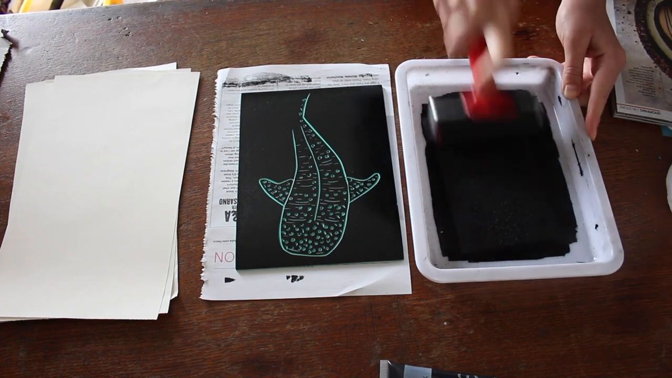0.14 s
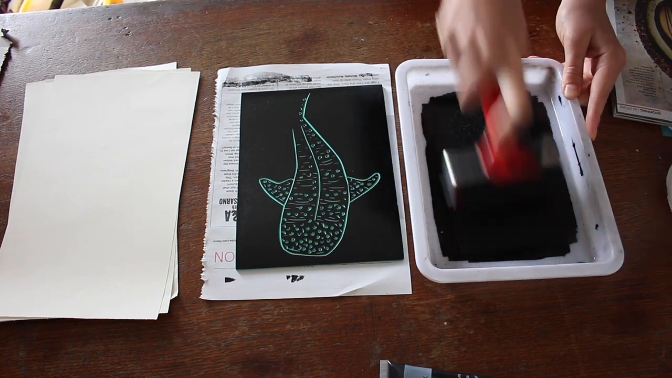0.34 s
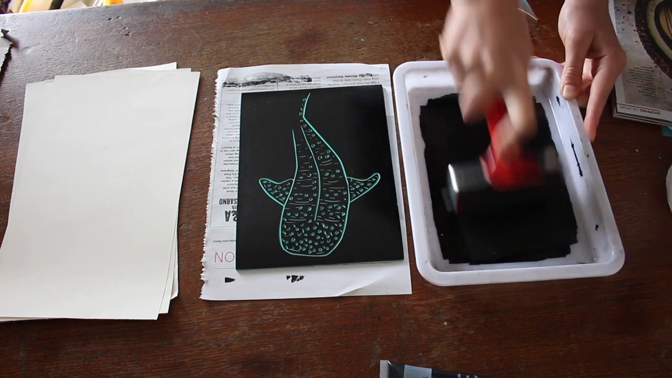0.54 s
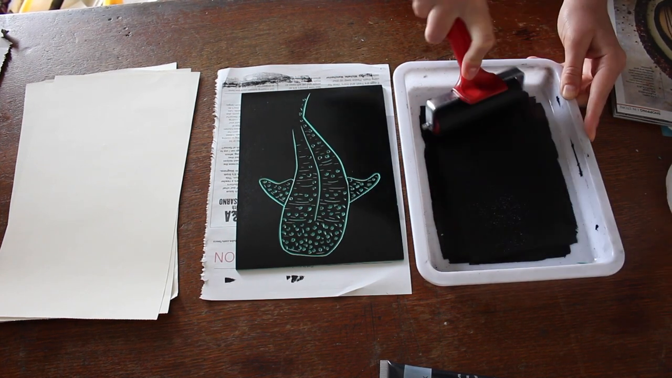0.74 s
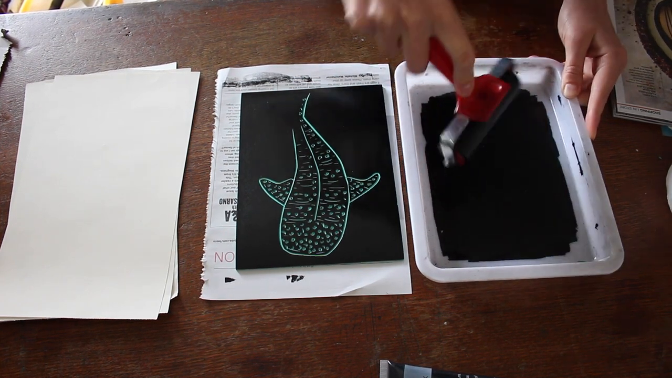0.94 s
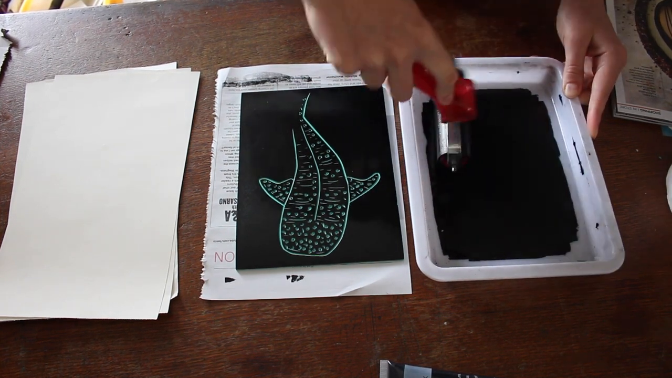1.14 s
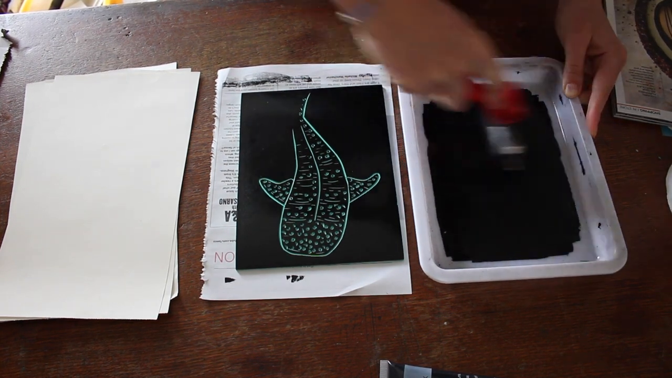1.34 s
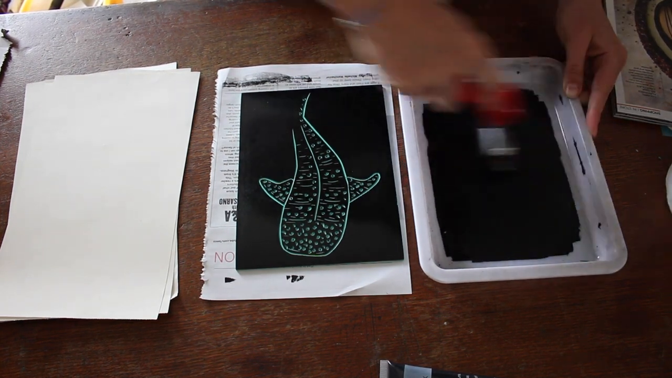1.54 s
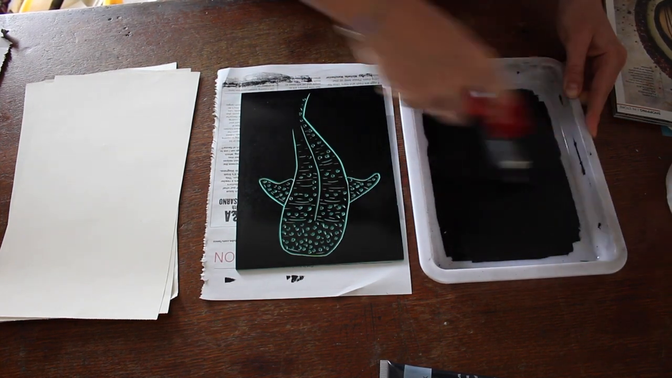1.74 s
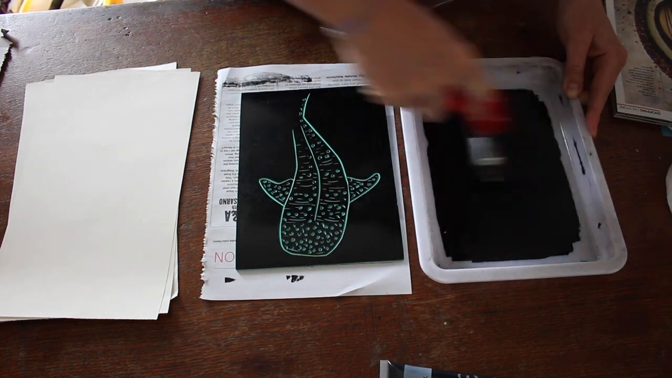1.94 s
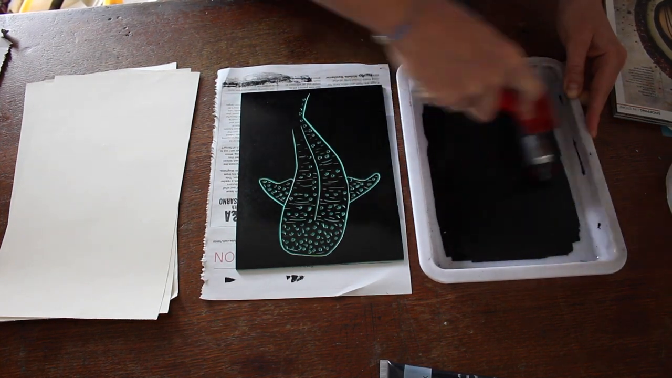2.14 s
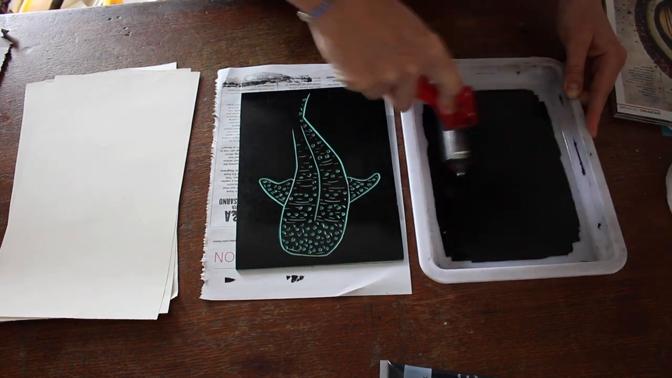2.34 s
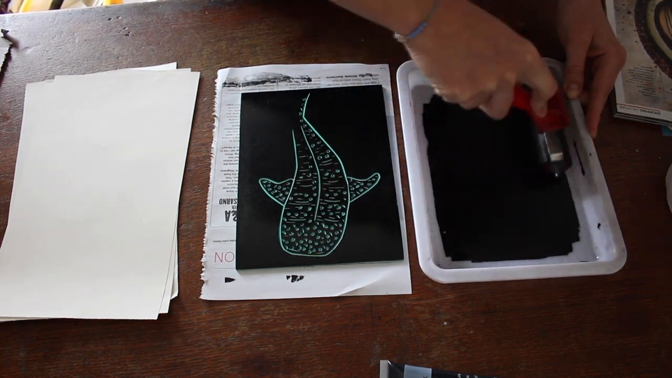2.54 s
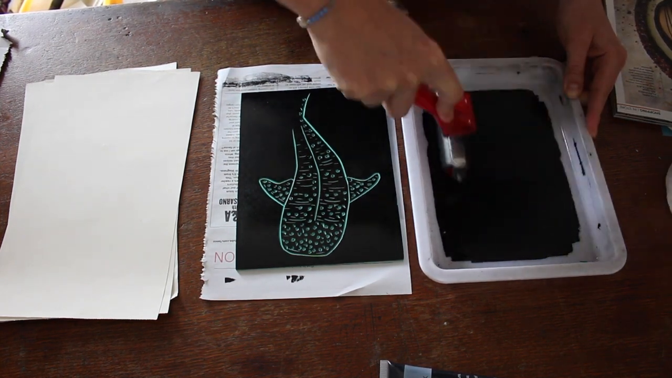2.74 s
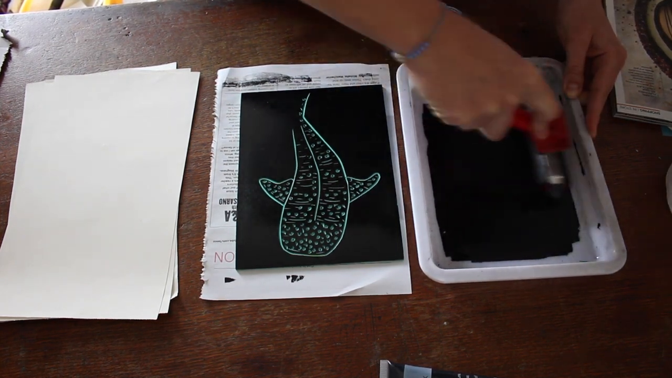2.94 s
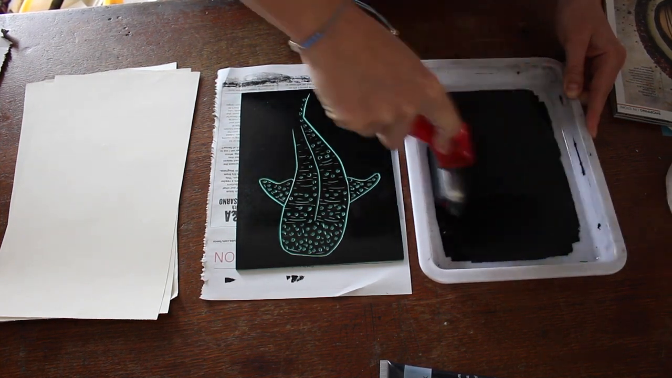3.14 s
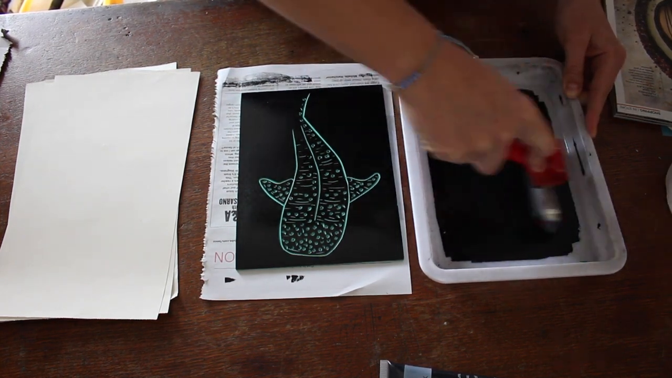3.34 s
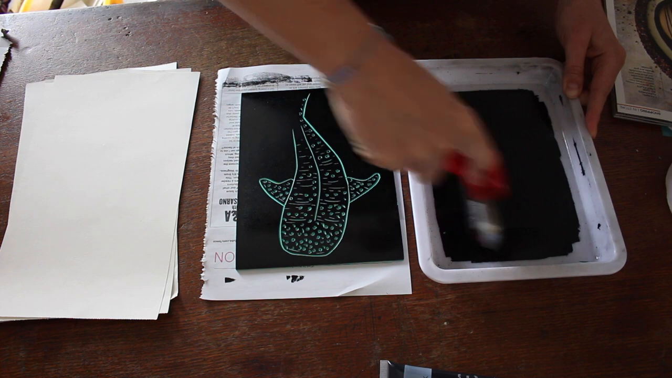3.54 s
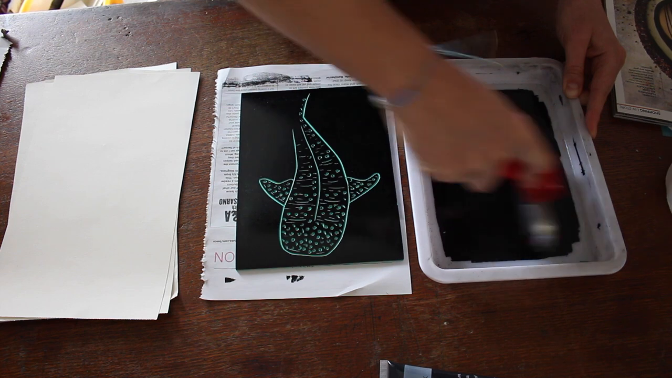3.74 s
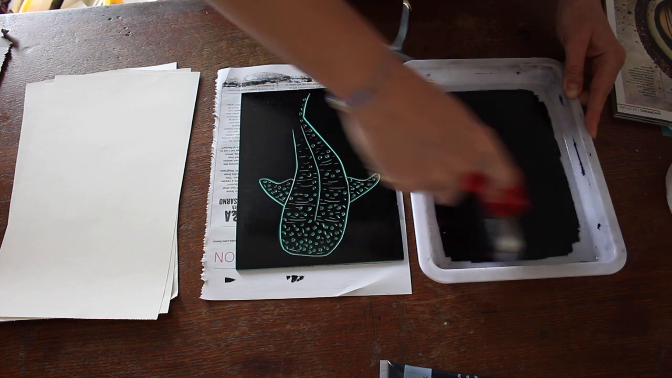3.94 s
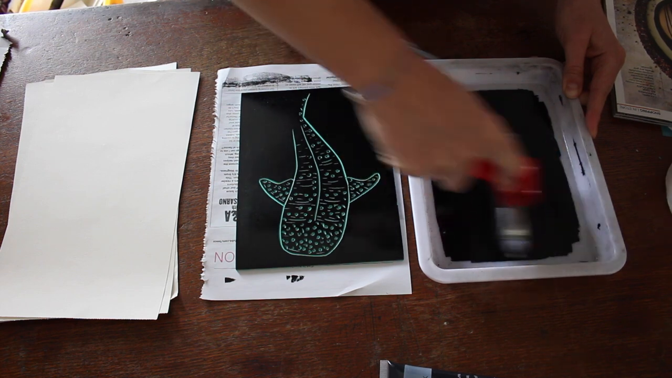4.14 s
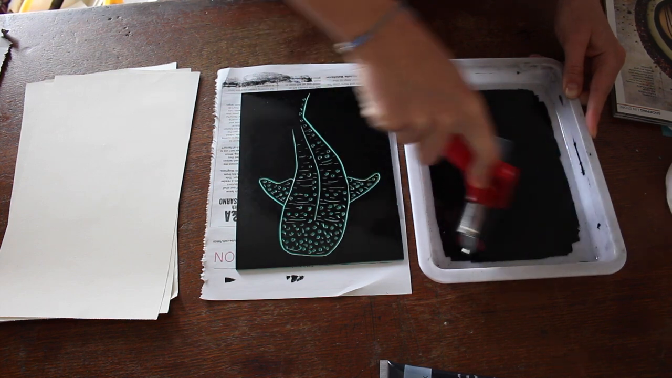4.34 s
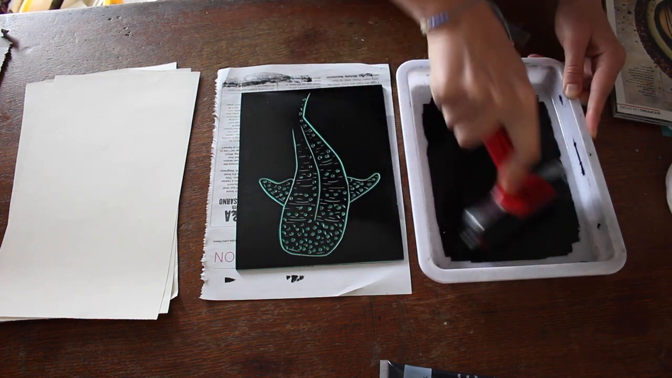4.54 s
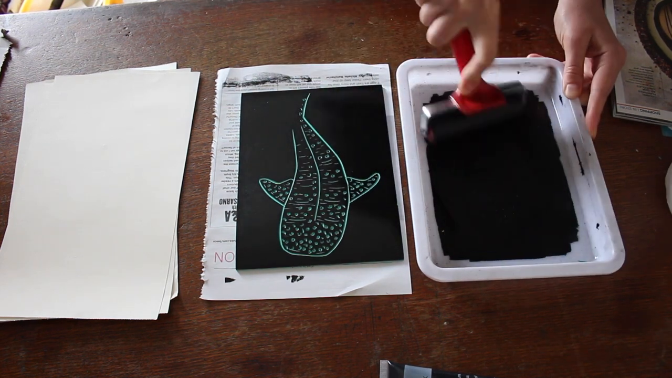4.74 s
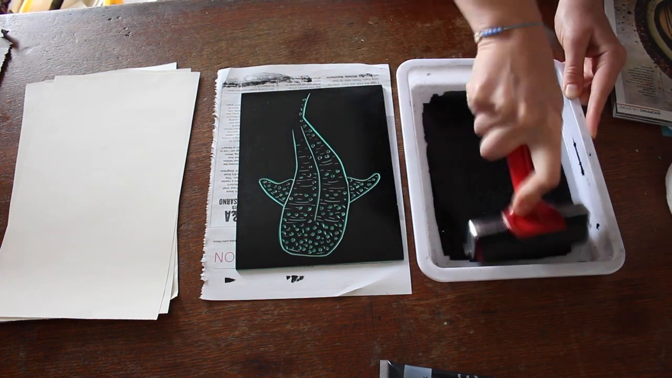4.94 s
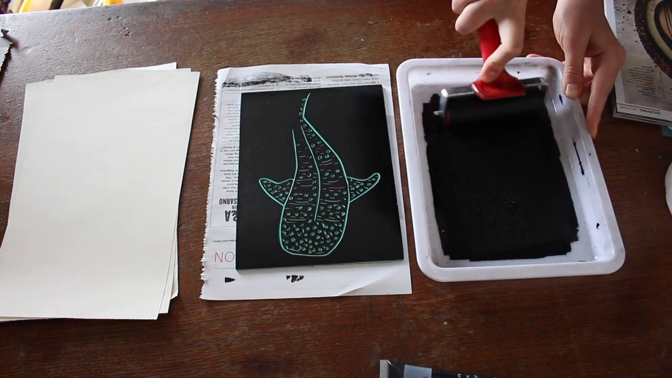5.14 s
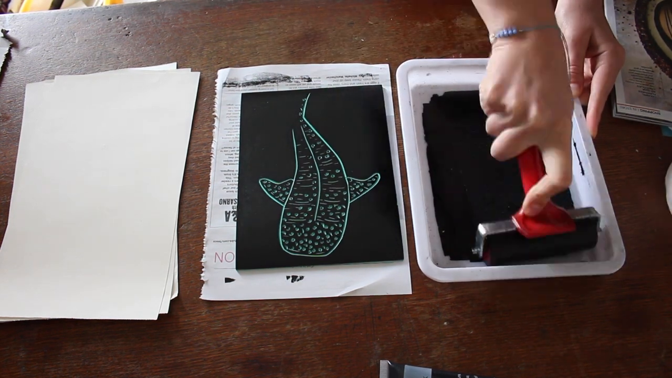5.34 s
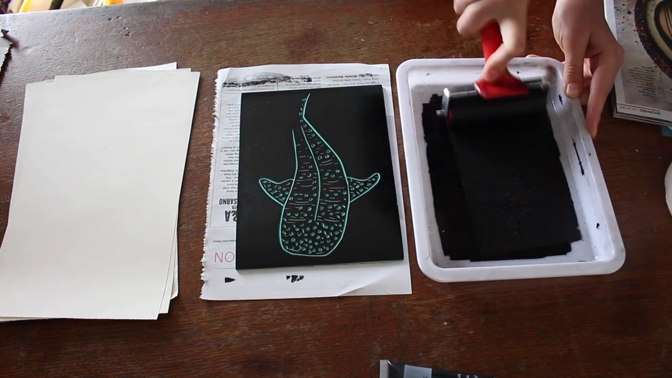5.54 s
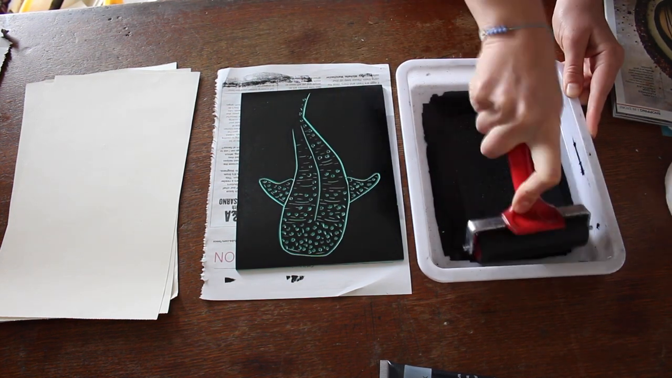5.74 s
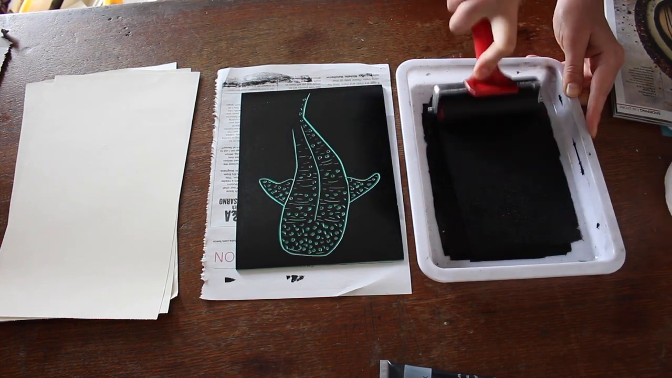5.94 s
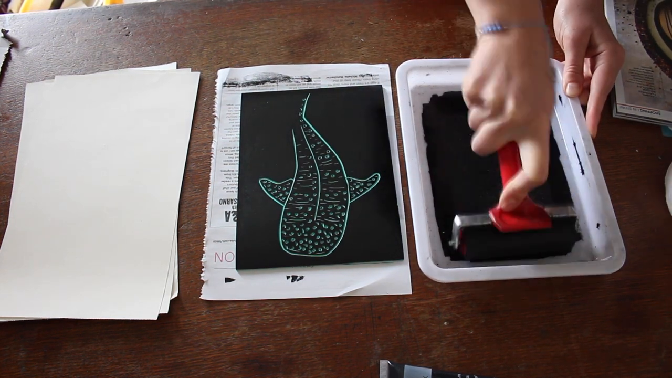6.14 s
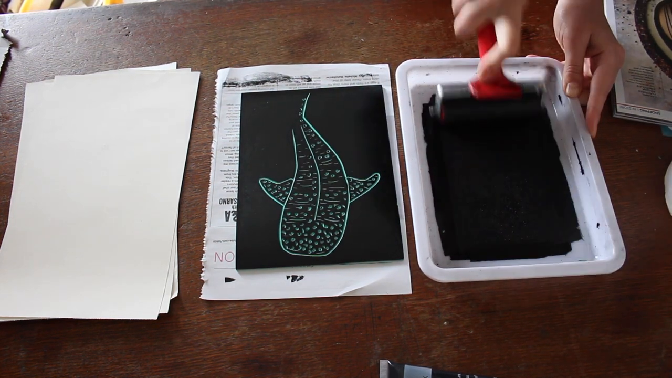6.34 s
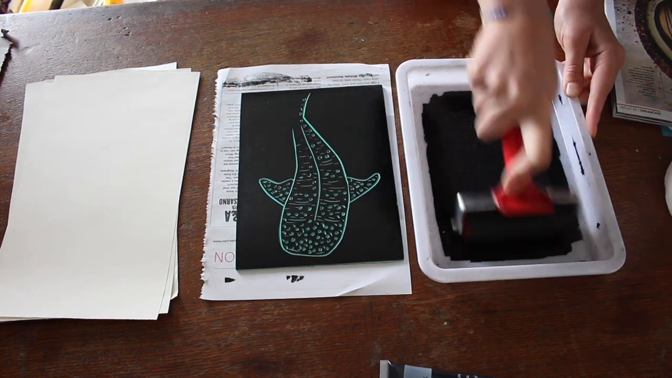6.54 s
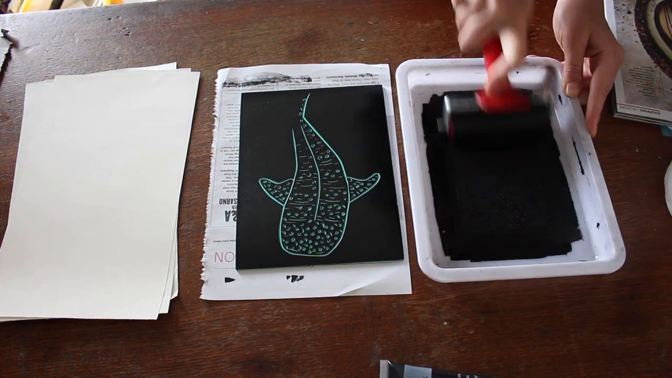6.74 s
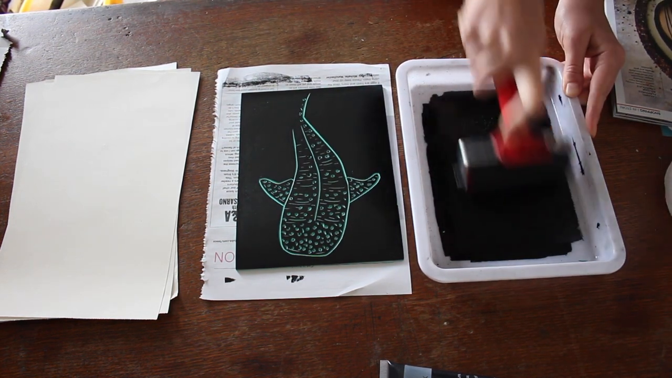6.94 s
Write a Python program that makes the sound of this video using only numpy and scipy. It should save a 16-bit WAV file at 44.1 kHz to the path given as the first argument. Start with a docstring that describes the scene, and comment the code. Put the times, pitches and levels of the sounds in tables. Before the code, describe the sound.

A rubber roller moves through tacky ink in a plastic tray on a wooden table, heard close in a small room with a short echo. From 0 to 0.87 seconds, long strokes make dense, bright, sticky crackling that swells with speed and thins at each turn, with hollow tray knocks and a strong low table drone. The roller then lifts, leaving faint air noise and a small tick or two until a sharp metallic clack and thud at about 1.32. Short, quieter strokes follow, roughly five per second, with softer crackle, occasional light ticks and little bass, fading almost away around 4.5. From about 4.65 to the end near 7 seconds, longer, louder strokes return in steady rhythm, with fuller crackle, pulsing low rumble, plastic bumps and frequent dry clacks from the loose axle. The microphone on the table takes up the drone, slightly stronger on the left.

```python
"""A rubber hand roller works tacky ink in a plastic tray on a wooden table, in a small room.
Long strokes come first, with bumps on the tray; the roller lifts at 0.87 s and lands again near 1.32 s.
Short, quieter strokes across the tray follow until about 4.6 s, then long, louder ones along it to the end.
Splitting ink is dense random clicks; tray, table and the loose axle's metal frame are struck or shaken
resonances; the microphone on the table takes up its drone; noise echoes and faint air noise lie around all."""
import sys
import numpy as np
from scipy import signal
from scipy.fft import rfft, irfft, next_fast_len
from scipy.io import wavfile
from scipy.ndimage import uniform_filter1d

SR = 44100
rng = np.random.default_rng(int(sys.argv[2]) if len(sys.argv) > 2 else 0)


def file_out(sig):
    """Save sig as 16-bit WAV at sys.argv[1]."""
    # one column per channel
    cols = np.atleast_2d(sig).T
    # limit, then scale
    lim = np.clip(cols, -1, 1)
    pcm = np.round(lim * 32767).astype(np.int16)
    wavfile.write(sys.argv[1], SR, pcm)


N = 312669


def from_db(db):
    """Decibels to gain."""
    return 10 ** (np.asarray(db) / 20)


def rms_one(x):
    """Scale to rms 1."""
    return x / np.sqrt(np.mean(x ** 2) + 1e-20)


def at_hz(points, hz):
    """Read a table on a log-frequency axis."""
    point_hz, value = np.transpose(points)
    return np.interp(np.log(hz), np.log(point_hz), value)


def colour(x, spectrum, lag_s=0):
    """Give x a spectrum and a delay; rms 1."""
    size = next_fast_len(N)
    hz = np.arange(1, size // 2 + 2) * SR / size
    response = from_db(at_hz(spectrum, hz)) * np.exp(-2j * np.pi * hz * lag_s)
    return rms_one(irfft(rfft(x, size) * response, size)[..., :N])


def above(x, cutoff_hz):
    """A small plate radiates little under its lowest mode."""
    return signal.sosfilt(signal.butter(2, cutoff_hz, "high", fs=SR, output="sos"), x)


def drift(rate_hz):
    """Slow chance, spread 1."""
    r = np.exp(-2 * np.pi * rate_hz / SR)
    settled = signal.lfilter([1], [1, -2 * r, r * r], rng.standard_normal(N + SR))[SR:]
    return rms_one(settled)


def grains(per_s, spread_db):
    """Random clicks of uneven size and sign."""
    size_db = spread_db * np.minimum(rng.exponential(1, N), 4)
    sizes = from_db(size_db) * rng.choice([-1, 1], N)
    return sizes * (rng.random(N) < per_s / SR)


def ring(clicks, hz, t60_s):
    """A unit click sets a dying sine of starting height 1 ringing."""
    r = from_db(-60 / (t60_s * SR))
    w = 2 * np.pi * hz / SR
    return signal.lfilter([0, np.sin(w)], [1, -2 * r * np.cos(w), r * r], clicks + 1e-18)


def steady(x, window_s, share):
    """Even out part of the chance swell of a narrow ringing."""
    local_rms = np.sqrt(np.maximum(uniform_filter1d(x ** 2, int(window_s * SR)), 1e-4))
    return rms_one(x / local_rms ** share)


def strike(times_s, level_at, modes, scatter_db, contact_s):
    """Each blow reaches every mode with chance strength, sign and small delay; level_at gives dB per blow."""
    at = np.round(times_s * SR).astype(int)
    out = np.zeros(N)
    luck = rng.standard_normal((len(at), len(modes), 2))
    for k, (hz, level_db, t60_s) in enumerate(modes):
        strength, lateness = luck[:, k, 0], luck[:, k, 1]
        size = from_db(level_at(hz, t60_s) + level_db + scatter_db * strength)
        late = (contact_s * SR * np.abs(lateness)).astype(int)
        clicks = np.zeros(N)
        clicks[np.minimum(at + late, N - 1)] = size * np.sign(lateness)
        out += ring(clicks, hz, t60_s)
    return out


# Strokes, each lasting to the next turn; levels relative. Columns: turn_s, snaps_db,
# change_db (along the stroke), pressed_s (hardest), hold_s (breadth), top_db, tray_db (both when pressed)
HAND_STROKES = [(-0.09, -35.0, -6, 0.0081, 0.016, -12, -26), (0.099, -34.5, 9, 0.25, 0.047, -20.5, -24.5),
                (0.324, -36, -1, 0.46, 0.031, -14.5, -27), (0.569, -38.5, -12, 0.711, 0.13, -19.5, -31.5),
                (1.366, -38.0, -1, 1.486, 0.04, -24.5, -39), (1.559, -38.0, 2, 1.708, 0.077, -24.5, -34),
                (1.764, -38.5, -6.5, 1.877, 0.046, -29, -31.5), (1.953, -39, -6, 2.059, 0.02, -23, -34.5),
                (2.127, -40, -1, 2.216, 0.036, -33.5, -33.5), (2.299, -41, -6, 2.415, 0.061, -27.0, -35.5),
                (2.491, -39, -11, 2.591, 0.066, -24.5, -35), (2.675, -40, -13, 2.803, 0.16, -26.5, -34),
                (2.872, -39, -11, 2.955, 0.014, -27.5, -34.5), (3.042, -38, 6, 3.199, 0.11, -29, -31.5),
                (3.241, -40.0, -5, 3.35, 0.02, -27, -35), (3.449, -41.5, -18, 3.529, 0.021, -27, -34.5),
                (3.639, -38, -13.5, 3.712, 0.013, -26.5, -35), (3.809, -39.5, -4, 3.89, 0.046, -31, -36),
                (4.008, -40, -14, 4.108, 0.031, -29, -36.5), (4.189, -43, -25, 4.28, 0.032, -31, -37),
                (4.415, -47, -14, 4.531, 0.058, -35, -42.5), (4.646, -37.5, -8, 4.76, 0.028, -13.5, -30),
                (4.85, -37, -3.5, 4.965, 0.04, -13, -26.5),
                (5.061, -36.5, -7.5, 5.165, 0.039, -12.5, -23.5),
                (5.262, -37.0, -1.5, 5.377, 0.031, -15.0, -27),
                (5.472, -35.5, -1.5, 5.577, 0.026, -15.5, -24),
                (5.665, -36.5, 1.5, 5.807, 0.03, -17, -24.5), (5.872, -36.0, -4, 5.98, 0.034, -15, -26.5),
                (6.076, -36.5, -4, 6.191, 0.041, -20.5, -27.5),
                (6.281, -35.5, -8.5, 6.409, 0.038, -13.5, -25.5),
                (6.487, -37.5, 2.5, 6.624, 0.044, -17.5, -30), (6.693, -37, -9.5, 6.82, 0.03, -15.0, -29),
                (6.909, -41, 6, 7.066, 0.02, -24.0, -31)]
LIFTED_S, LAST_TURN_S = 0.87, 7.18   # roller leaves the ink; last stroke ends
OVERLAP_S = 0.0098   # film goes on splitting past the turn
ACROSS_FROM_S, ACROSS_TO_S = 1.3, 4.6   # short strokes across the tray; the others run along it
EVEN_ALONG, EVEN_ACROSS = 1.36, 0.47   # evenness of speed: long strokes hold it
LOWER_DB = -2   # lower snaps over upper
QUICK_START = 0.93   # under 1: gains speed faster than it loses it


def strokes(creep):
    """Snaps swell with the square of roller speed, one rise and fall a stroke; some ink creeps at the turns."""
    t = np.arange(N) / SR
    upper, lower, pace = np.zeros((3, N))
    turns_s = np.append(np.transpose(HAND_STROKES)[0], LAST_TURN_S)
    for (turn_s, snaps_db, change_db, *_), next_s in zip(HAND_STROKES, turns_s[1:]):
        even = EVEN_ACROSS if ACROSS_FROM_S < turn_s < ACROSS_TO_S else EVEN_ALONG
        start_s = turn_s - OVERLAP_S
        end_s = LIFTED_S if turn_s < LIFTED_S < next_s else next_s + OVERLAP_S
        near = (t > start_s - .03) & (t < end_s + .03)
        part = np.clip((t[near] - start_s) / (end_s - start_s), 0, 1)
        speed = np.tanh(even * np.sin(np.pi * part ** QUICK_START)) / np.tanh(even)
        gain = from_db(snaps_db + change_db * (part - .5)) * (speed ** 2 + creep)
        crackle_power = from_db(2 * (snaps_db - 18))   # weak steady low snaps under the whole stroke
        pace[near] = np.maximum(pace[near], speed)
        upper[near] += gain ** 2
        lower[near] += (gain ** 2 + crackle_power) * from_db(2 * LOWER_DB)
    return np.sqrt(upper), np.sqrt(lower), pace


LEFT_LAG_S = 1.6e-5   # the snaps reach the left side slightly later


def snaps(spectrum, gain, per_s, spread_db, alike):
    """Threads snap all along the roller, so the two sides hear partly different snaps."""
    mid, side = grains(per_s, spread_db), grains(per_s, spread_db)
    both = np.sqrt(1 + alike) * mid + np.sqrt(1 - alike) * side * [[1], [-1]]
    return gain * colour(both, spectrum, np.array([[LEFT_LAG_S], [0]]))


# Spectrum of the upper snaps. Columns: freq_hz, level_db (per Hz, relative)
UPPER_SNAPS = [(2350, -20), (4000, -37.5), (4540, -12), (5940, -5.5), (6250, -6), (10200, -2.5),
               (12600, -5.5), (15700, -10.5)]
# Spectrum of the lower snaps. Columns: freq_hz, level_db (per Hz, relative)
LOWER_SNAPS = [(530, -4), (900, 0), (1140, -3), (1720, 0), (2640, 3), (4160, 0), (4520, 1.5), (6500, -13.5),
               (8450, -70), (14300, -120)]


def ink(upper, lower):
    """The splitting film: dense bright snaps over sparser low ones, both uneven with its thickness."""
    patches = from_db(1.3 * drift(36))   # the film is thicker in places
    tack = patches * from_db(3.5) * snaps(UPPER_SNAPS, upper, 9000, 1.9, 0.52)
    low_gain = from_db(1.5 + 0.7 * drift(26))
    low_tack = patches * low_gain * snaps(LOWER_SNAPS, lower, 2500, 0.76, 0.82)
    return tack, low_tack


# Spectrum of the air noise. Columns: freq_hz, level_db (per Hz, relative)
AIR_SPECTRUM = [(35, -31), (60, 0), (779, -4), (896, -7.5), (1500, -11.5), (3800, -13.5), (15700, -32)]
AIR_DB = -50.5   # rms over both sides


def air_noise():
    """Steady coloured noise, mostly unlike on the two sides."""
    shared, own = rng.standard_normal(N), rng.standard_normal((2, N))
    return from_db(AIR_DB) * colour(shared + 4.3 * own, AIR_SPECTRUM)


def swell(at_s, peak_db, rise_db_per_s, fall_db_per_s, hold_s):
    """Summed power of swells that climb to a rounded top and sink again."""
    t = np.arange(0, N + 64, 64) / SR
    at_s, peak_db, hold_s = (np.reshape(v, (-1, 1)) for v in (at_s, peak_db, hold_s))
    since_s = t - at_s
    away_s = np.sqrt(since_s ** 2 + hold_s ** 2) - hold_s
    level_db = peak_db - np.where(since_s < 0, rise_db_per_s, fall_db_per_s) * away_s
    return np.interp(np.arange(N) / SR, t, np.sum(from_db(2 * level_db), axis=0))


TOP_RISE_DB_PER_S, TOP_FALL_DB_PER_S = 366, 278   # the table top follows the pressing hand
TRAY_RISE_DB_PER_S, TRAY_FALL_DB_PER_S = 208, 173   # the tray follows more gently
TRAY_LONGER_S = 0.029   # added to the breadth of the pressing
TRAY_FOLLOWS_SPEED = 0.58   # the tray quietens at the turns
STEADYING_S, STEADYING_DB = 1.12, -47   # the table stirs faintly while the roller is up
LANDING_S, LANDING_DB, LANDING_FALL_DB_PER_S = 1.318, -19.5, 87   # roller sets the table top ringing
BUMP_IN_TOP_DB, BUMP_FALL_DB_PER_S = -11.5, 195   # what a bump passes on to the table top


def load(speed):
    """The hand bears down once a stroke; returns the levels of table top and tray in dB."""
    pressed_s, hold_s, top_db, tray_db = np.transpose(HAND_STROKES)[3:]
    top = swell(np.append(pressed_s, STEADYING_S), np.append(top_db, STEADYING_DB),
                TOP_RISE_DB_PER_S, TOP_FALL_DB_PER_S, np.append(hold_s, .04))
    bump_s, bump_db = np.transpose(TRAY_BUMPS)[:2]
    top = top + swell(bump_s + 0.012, bump_db + BUMP_IN_TOP_DB, 2000, BUMP_FALL_DB_PER_S, .004)
    landing = swell(LANDING_S, LANDING_DB, 3600, LANDING_FALL_DB_PER_S, 0.0018)
    tray = swell(pressed_s, tray_db, TRAY_RISE_DB_PER_S, TRAY_FALL_DB_PER_S, hold_s + TRAY_LONGER_S)
    tray = tray * (speed + 0.055) ** (2 * TRAY_FOLLOWS_SPEED)
    top_power = top + landing + 1e-9
    tray_power = tray + from_db(-22.5) * landing + 1e-9
    return 10 * np.log10(top_power), 10 * np.log10(tray_power)


TABLE_HZ, TABLE_T60_S = 140.1, 0.54
# Table frame modes. Columns: mode_hz, level_db (relative), t60_s
TABLE_LEGS = [(52.7, 1, 0.23), (76.4, -4, 0.66)]
# Plastic tray modes, rolled and bumped. Columns: mode_hz, level_db (relative), t60_s
TRAY_MODES = [(187, 1.5, 0.083), (231.5, -2.5, 0.21), (287.8, -3, 0.12), (331.6, -4.5, 0.089),
              (392.5, 0.5, 0.051), (464.5, -1.5, 0.061), (505.5, -3, 0.064), (591.7, -6.5, 0.083),
              (695, -5.5, 0.039), (811, -12, 0.071), (908, -8.5, 0.049), (1091, -9.5, 0.035),
              (1287, -13, 0.027), (1660, -29, 0.024)]


def rolling(speed):
    """Unevenness under the roller drives the table top, its frame and the tray."""
    top_db, tray_db = load(speed)
    drone = rms_one(ring(rng.standard_normal(N), TABLE_HZ, TABLE_T60_S))
    top = above(steady(drone, 0.024, 0.42), 76)
    shaking = from_db(0.86 * top_db) * rng.standard_normal(N)   # the frame answers less steeply
    legs = np.zeros(N)
    for k, (hz, level_db, t60_s) in enumerate(TABLE_LEGS):
        legs += from_db(level_db) * ring(shaking, hz, t60_s) * (-1) ** k
    lumps = np.diff(grains(400, 2.2), prepend=0)
    tray = np.zeros(N)
    for k, (hz, level_db, t60_s) in enumerate(TRAY_MODES):
        tray += from_db(level_db) / hz * ring(lumps, hz, t60_s) * (-1) ** k
    table = from_db(top_db) * top + from_db(-51.5) * rms_one(legs)
    return table, from_db(tray_db) * steady(rms_one(tray), 0.034, 0.87)


# Roller on the tray. Columns: start_s, level_db (relative), hardness_db_per_octave, favoured_hz
TRAY_BUMPS = [(0.012, -12.5, -8, 400), (0.188, -11, -12, 386), (0.417, -14, -11, 282),
              (0.458, -12.5, 1, 390), (0.532, -6.5, 4.5, 570), (0.661, -8.5, 1.5, 320),
              (0.885, -30, 1, 299), (1.016, -35, 1, 592), (1.313, -15.5, 6.5, 407), (1.466, -23.5, -1, 299),
              (1.626, -23.5, -7, 297), (1.7, -21.5, 5.5, 315), (2.249, -18, 9.5, 790), (2.357, -23, 8, 302),
              (2.673, -17, 5.5, 490), (2.729, -20.5, 0, 299), (2.819, -13.5, 4, 303),
              (3.143, -15.5, 9, 390), (3.678, -23.5, 6, 285), (3.931, -18.5, 9, 820),
              (4.686, -18.5, -3, 396), (4.75, -9, .5, 412), (4.941, -13.5, 9, 406), (5.139, -8.5, 6, 430),
              (5.219, -20.5, 9, 280), (5.305, -21, -1, 283), (5.393, -15.5, 7, 286),
              (5.547, -13.5, -1, 288), (5.726, -10.5, 4.5, 377), (5.957, -16.5, -19, 272),
              (6.021, -15, -8, 277), (6.122, -11.5, 1.5, 424), (6.199, -18, -18, 300),
              (6.369, -11, 3.5, 401), (6.559, -17, -11, 413), (6.784, -11, 4, 406), (6.919, -20.5, 6, 290)]
JUDDER_S = .035


def bumps():
    """Hardness tilts the tray modes, the place favours one; the roller judders on in three weaker contacts."""
    start_s, bump_db, hardness, favoured_hz = np.transpose(TRAY_BUMPS)
    step = np.arange(4)
    spacing = (step + .6 * rng.random((len(start_s), 4)) * (step > 0)) / 3
    times_s = (start_s[:, None] + JUDDER_S * spacing).ravel()
    contact_db = (bump_db[:, None] - 10.5 - 6.7 * np.sqrt(step)).ravel()
    tilt, favoured_hz = np.repeat(hardness, 4), np.repeat(favoured_hz, 4)

    def level_at(hz, t60_s):
        """Level of one mode for every contact."""
        near_db = 6.6 * np.exp(-(np.log2(hz / favoured_hz) / 0.24) ** 2)
        return contact_db + tilt * np.clip(np.log2(hz / 400), -.4, 1) + near_db

    return strike(times_s, level_at, TRAY_MODES, 2.1, 0.00152)


# Axle knocks in the frame. Columns: start_s, level_db (relative), strongest_hz
AXLE_CLACKS = [(0.2982, -19, 3600), (0.5336, -9, 1560), (0.5426, -16, 1520), (0.6596, -20, 2820),
               (0.7844, -21, 3180), (0.885, -16.5, 2530), (0.911, -21, 3400), (1.0193, -15, 2850),
               (1.3121, -10, 1690), (1.3169, -4.5, 3840), (1.6276, -12.5, 2660), (2.162, -20, 3320),
               (2.2465, -27, 3350), (2.3591, -18.5, 3370), (2.5296, -17, 3360), (2.6758, -20, 3350),
               (2.7307, -17.5, 3300), (2.82, -18, 1570), (3.1436, -19, 1410), (4.6568, -34, 5280),
               (4.7508, -11, 1980), (4.8062, -16.5, 1600), (4.9009, -15, 2450), (5.0992, -20.5, 3670),
               (5.1408, -16.5, 2940), (5.208, -15.5, 3430), (5.3193, -16, 2190), (5.3987, -13.5, 3280),
               (5.6245, -17, 2500), (5.7285, -16, 3080), (5.909, -16.5, 2900), (6.02, -14, 1700),
               (6.121, -19.5, 3060), (6.371, -17.5, 2990), (6.4466, -13, 1730), (6.562, -16, 2460),
               (6.7212, -19, 3720), (6.785, -27, 2260), (6.921, -10, 1560), (7.0074, -15, 2540)]
# Metal frame modes. Columns: mode_hz, level_db (relative), t60_s
FRAME_MODES = [(1256, -2, 0.0088), (1560, -1.5, 0.0042), (1763, -4.5, 0.035), (2100, -1, 0.0074),
               (2470, 6.5, 0.0025), (2865, -9, 0.058), (3210, -0.5, 0.0064), (3470, -7, 0.044),
               (3660, -7, 0.12), (3950, 3, 0.0048), (4830, -1, 0.016), (5130, 0, 0.0043), (5820, -8, 0.013),
               (6100, -9, 0.0029), (8000, -4, 0.0039), (10500, -5, .003)]
LONG_T60_S = .015


def axle(speed_gain):
    """Metal on metal: dry ticks, strongest near their own region, over a faint chance rattle while rolling."""
    start_s, clack_db, strongest_hz = np.transpose(AXLE_CLACKS)

    def level_at(hz, t60_s):
        """Only a hard blow sets the long modes ringing: the grip damps them."""
        damped_db = .7 * clack_db * (t60_s > LONG_T60_S)
        return clack_db - 8.0 - 4.1 * np.log2(hz / strongest_hz) ** 2 + damped_db

    kicks = speed_gain * grains(70, 3.0)
    rattle = np.zeros(N)
    for k, (hz, level_db, t60_s) in enumerate(FRAME_MODES):
        if t60_s < LONG_T60_S:
            rattle += from_db(level_db) * ring(kicks, hz, t60_s) * (-1) ** k
    return strike(start_s, level_at, FRAME_MODES, 2.5, .0008) + from_db(-3.5) * rattle


# Decay of the room. Columns: freq_hz, t60_s
ROOM_DECAY = [(200, 0.14), (2000, 0.24), (5000, 0.22), (10000, 0.17)]
UNLIKE_HZ = 1950   # above it the two sides hear unlike echoes


def room(x):
    """Octave bands of noise, each dying at its own rate, wider towards the treble."""
    t = np.arange(SR // 2) / SR
    tail = np.zeros((2, len(t)))
    shared, own = rng.standard_normal(len(t)), rng.standard_normal((2, len(t)))
    for hz in 177 * 2. ** np.arange(7):
        band = signal.butter(2, [hz / np.sqrt(2), hz * np.sqrt(2)], "band", fs=SR, output="sos")
        white = (shared + own * hz / UNLIKE_HZ) / np.sqrt(1 + (hz / UNLIKE_HZ) ** 2)
        tail += signal.sosfilt(band, white) * from_db(-60 * t / at_hz(ROOM_DECAY, hz))
    tail = tail * np.clip(t / 0.0021, 0, 1)   # echoes fade in over 2.1 ms
    return signal.fftconvolve(x[None], rms_one(tail) / np.sqrt(len(t)), axes=1)[:, :N]


def scene():
    """Bass arrives through the table, stronger on the left; the rest through the air."""
    upper, lower, pace = strokes(creep=0.027)
    tack, low_tack = ink(upper, lower)
    air = air_noise()
    table, rolled_tray = rolling(pace)
    tray = above(rolled_tray + bumps(), 124)
    clacks = above(axle(lower), 670)
    far_ink = from_db(-14) * (tack[0] - tack[1]) + from_db(-1) * (low_tack[0] - low_tack[1])
    echoes = room(from_db(3.0) * clacks + from_db(-6.5) * tray + far_ink)
    through_table = table * from_db([[1.8], [-2.1]])   # left, right
    from_tray = tray * from_db([[1.1], [-1.2]])
    bright = (tack + low_tack + clacks) * from_db([[-.4], [.6]])
    return through_table + from_tray + bright + echoes + air


MIC_LOW_HZ, CUTOFF_HZ = 49.3, 15890


def record(dry):
    """The microphone is weak in the deep bass; the top is cut."""
    thin = signal.sosfilt(signal.butter(3, MIC_LOW_HZ, "high", fs=SR, output="sos"), dry)
    return signal.sosfilt(signal.ellip(14, .5, 60, CUTOFF_HZ, fs=SR, output="sos"), thin)


dry = scene()
out = record(dry)
file_out(out)
```